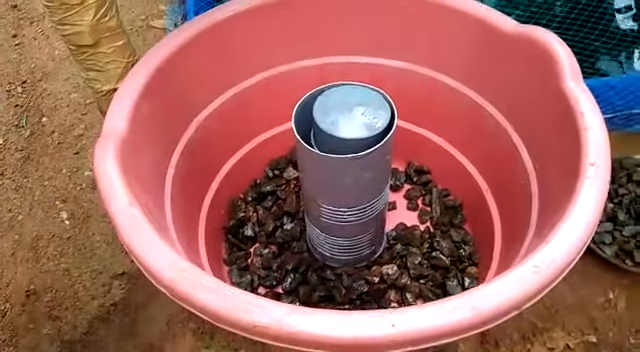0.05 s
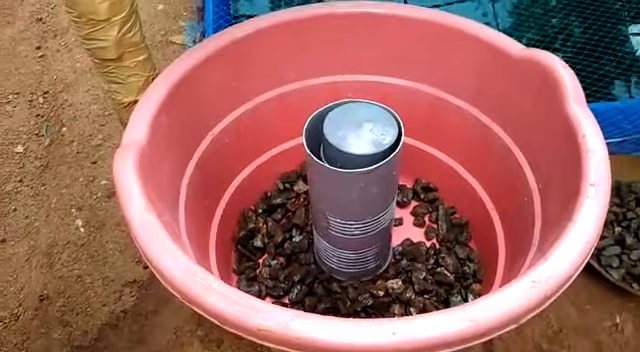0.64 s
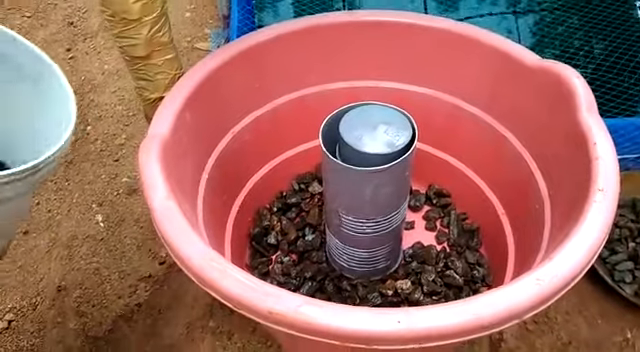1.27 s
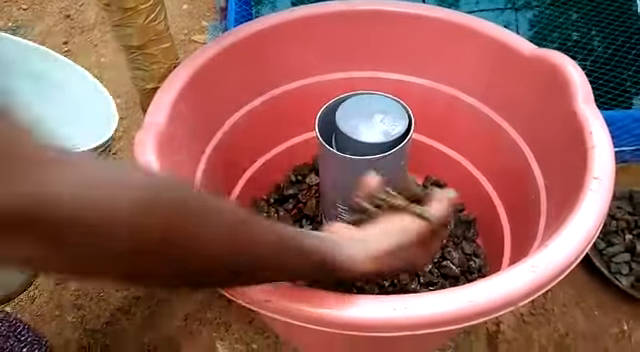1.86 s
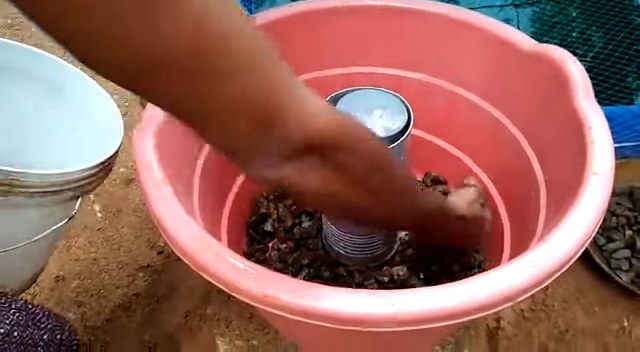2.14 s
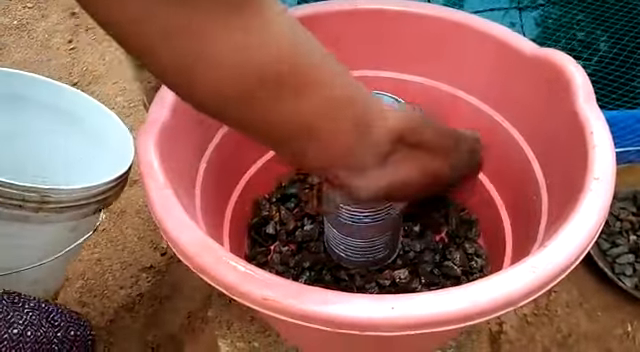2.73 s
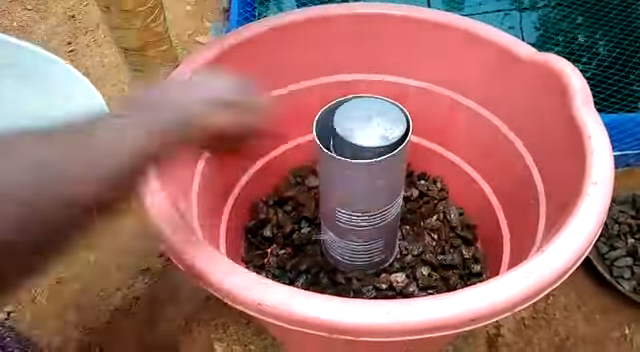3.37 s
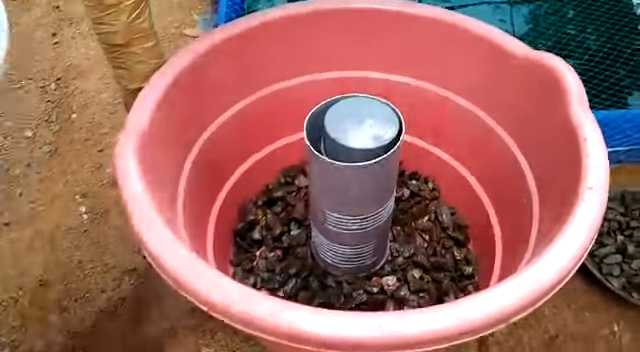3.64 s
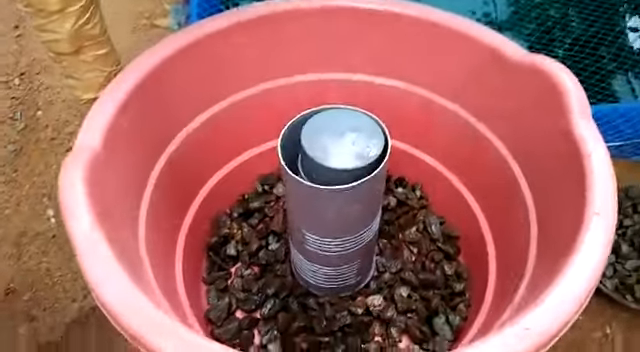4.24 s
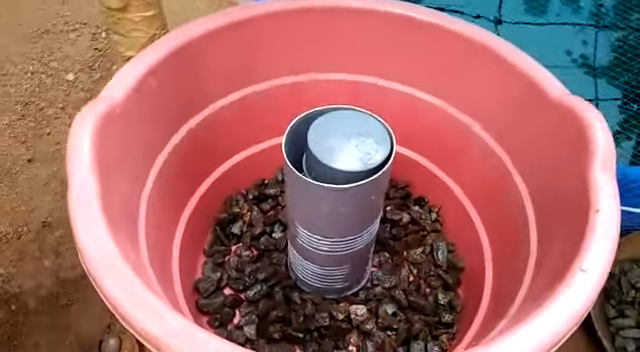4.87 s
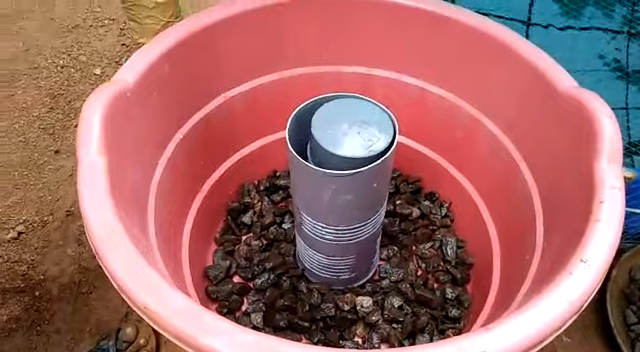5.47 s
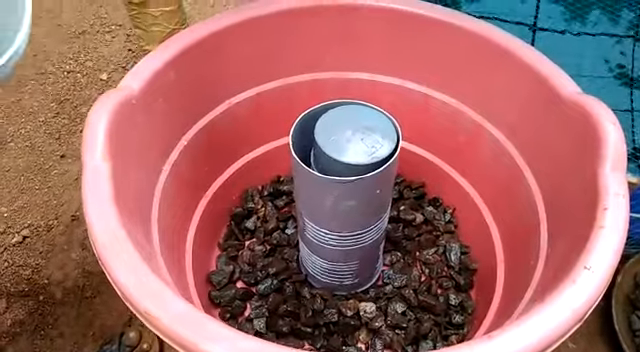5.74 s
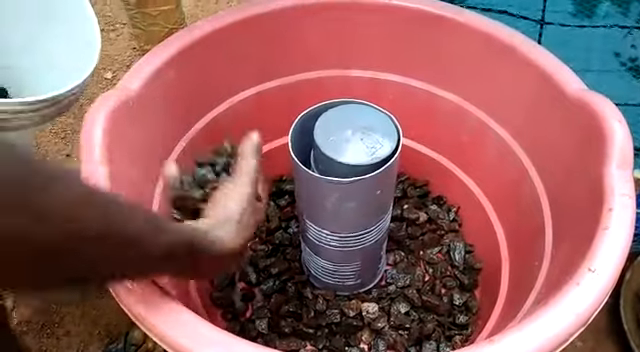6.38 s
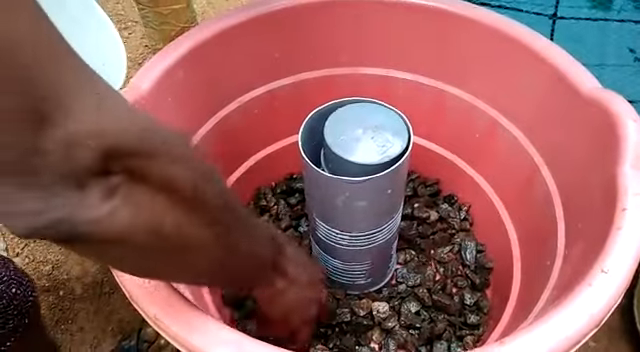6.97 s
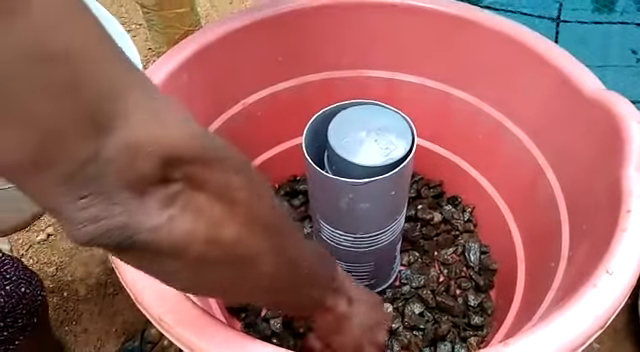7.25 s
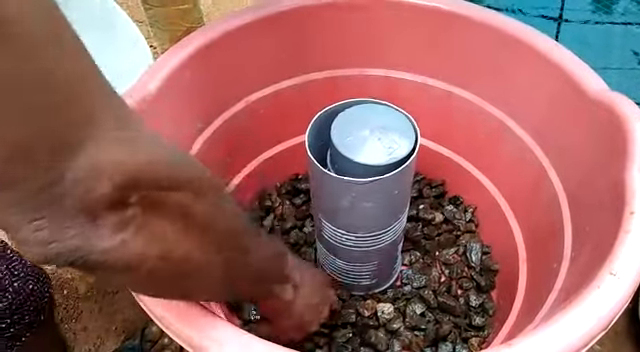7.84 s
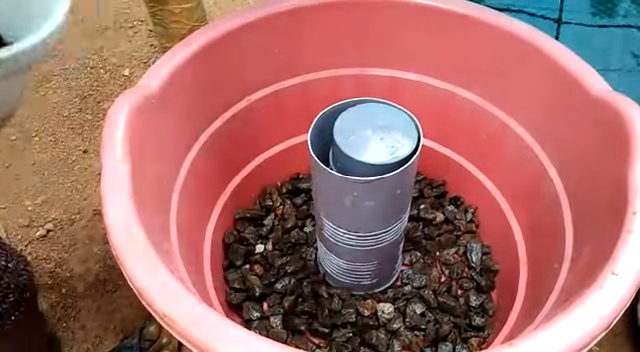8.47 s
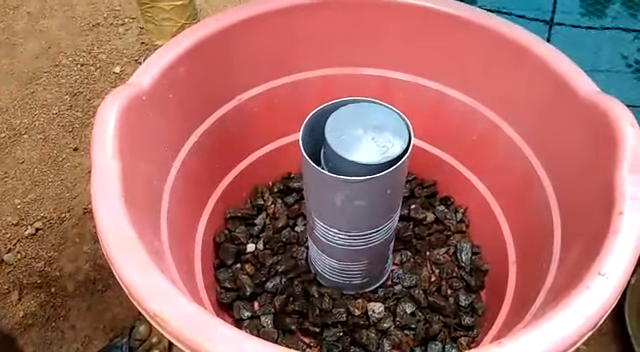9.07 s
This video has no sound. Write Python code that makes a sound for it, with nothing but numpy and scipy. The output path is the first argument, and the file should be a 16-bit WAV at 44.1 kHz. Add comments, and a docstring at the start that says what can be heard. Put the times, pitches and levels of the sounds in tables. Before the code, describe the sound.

Gravel rattles as a hand digs in a bucket, then clatters into a plastic tub and gets pushed around, twice.

```python
"""Crushed stone, scooped by the handful from a bucket, dropped into a plastic tub and spread, outdoors. Each
contact is a short hollow clack on plastic with a bright stone-on-stone tick. Small stones rattle densely
between the single hits. The plastic bottoms drum under heavy falls, the tub's walls ring briefly and the load
shakes the soil. Faint steady air lies underneath; a faint gurgle comes near the end."""
import sys
import numpy as np
from scipy import signal
from scipy.fft import rfft, irfft
from scipy.io import wavfile
from scipy.ndimage import uniform_filter1d

SR = 44100
rng = np.random.default_rng(int(sys.argv[2]) if len(sys.argv) > 2 else 0)


def output_pcm(signal):
    """Save a mono or channel-first signal as 16-bit PCM at the path in sys.argv[1].

    Samples are clipped to [-1, 1] before scaling.
    """
    pcm = np.clip(np.atleast_2d(signal).T, -1, 1) * 32767
    wavfile.write(sys.argv[1], SR, np.round(pcm).astype(np.int16))


N = 406161

# hand digging in the bucket: t/s, length/s, clack/dB, tick/dB re clack, drum/dB re clack, growth/dB
SCOOPS = [(0.0, 0.092, -18.0, -8.5, -13.5, 3), (0.135, 0.208, -20.5, -10.5, -22, -3.5),
          (0.353, 0.22, -30, -9.5, -17.5, 3.0), (0.565, 0.15, -26.5, -8.5, -12.5, 3),
          (0.773, 0.115, -35.5, -7, -12.0, 7.5), (0.947, 0.181, -34.5, -6.0, -16, -3.5),
          (1.231, 0.102, -63.0, -3.5, -5.5, 16.5), (1.414, 0.069, -44, -11, -13, 5.5),
          (3.913, 0.045, -61.5, -27, -7, 7), (3.99, 0.012, -29.0, -10, -7.5, 3),
          (4.072, 0.171, -19.0, -8.5, -11.0, -0.5), (4.266, 0.123, -26, -8, -16.5, -2),
          (4.412, 0.151, -33.5, -10.0, -12.5, 5.5), (4.578, 0.272, -27.0, -9, -13.5, -1.5),
          (4.87, 0.127, -30, -7.5, -9, 3.5), (5.031, 0.196, -31, -8.0, -16.5, -4),
          (5.28, 0.065, -49.5, -6, -7, 1.0), (5.476, 0.023, -37.5, -1.5, -19, -3.5),
          (5.784, 0.061, -50.5, -11.5, -9.5, 4.5), (5.977, 0.16, -61.0, -9, -19.5, -16),
          (8.439, 0.016, -52.0, -8, -10, 3.5), (8.732, 0.065, -41.5, -20, -29.0, 1),
          (8.773, 0.197, -37.0, -8.0, -8.5, -4.0), (9.008, 0.08, -33.5, -6, -12.5, 0),
          (9.169, 0.057, -47, -13.0, -13, 7.0)]
# stones sliding into the tub and pushed about: columns as SCOOPS
SPREADS = [(2.316, 0.082, -74.5, 15, -2.5, 9.5), (2.441, 0.062, -26.5, -7.5, -5, 7.5),
           (2.561, 0.139, -27, -8, -12.5, -0.0), (2.715, 0.065, -25.5, -12, -25, 3),
           (2.801, 0.158, -30, -9.5, -21, -7.0), (3.033, 0.12, -42, -7.5, -12, 0.5),
           (3.179, 0.14, -33.0, -10.0, -20.0, -0.5), (3.367, 0.12, -36.5, -10.5, -15.5, -12),
           (6.648, 0.091, -78, 20.5, -20, 7.5), (6.756, 0.069, -26, -3.0, -20, -6.5),
           (6.879, 0.138, -32, -6, -17, 1), (7.052, 0.033, -30.0, -9.5, -14.5, 4),
           (7.15, 0.118, -37, -8.5, -19.5, 3.5), (7.34, 0.117, -37, -7.0, -17, 3),
           (7.521, 0.054, -32.0, -9.5, -18.5, -5), (7.635, 0.017, -36.5, -8, -22.5, 5.0),
           (7.749, 0.094, -32.5, -10.5, -12.5, 1), (7.929, 0.028, -29, -10.0, -14.5, -0.5),
           (8.015, 0.078, -39, -10.5, -8.5, -7.5), (8.124, 0.055, -39, -10.5, -19.5, -1.5)]
# weights of the stone resonances: f/Hz, level/dB
TICK_SPECTRUM = [(2800, 0.5), (3400, -5), (4000, -0.5), (4900, -4.5), (5800, -1.5), (6800, -1.5),
                 (8200, 8.5), (9200, 7.5), (10500, 1), (12500, -2.5), (14500, -6)]
# plastic wall modes: f/Hz, level/dB, t60/s
WALL_MODES = [(130, -3.5, 0.041), (267, -9.5, 0.066), (451.4, -4, 0.054), (610, -6.5, 0.21),
              (753, -3.5, 0.085), (862, -9, 0.023), (907, -6.5, 0.21), (1157, -5, .07),
              (1361, -16.5, 0.075), (1477, -7, 0.021), (1620, -14, .06), (1900, -5.5, 0.015),
              (2100, -13.5, 0.14)]
# plastic bottom modes: f/Hz, level/dB, t60/s
BOTTOM_MODES = [(160, -25, .05), (191, -10, 0.1), (230, -6, 0.025), (271, 0.5, 0.061), (311.8, -4.5, 0.094),
                (428, -17, .08)]
# heavy falls on the bottom: t/s, level/dB
THUMPS = [(0.018, -18.5), (0.052, -17), (0.135, -24), (0.233, -31), (0.277, -24.5), (0.338, -24),
          (0.598, -27.5), (0.967, -20.5), (2.412, -7.5), (2.485, -16.5), (2.551, -13.5), (2.583, -22),
          (2.622, -24.5), (2.75, -24), (3.995, -23.5), (4.109, -17), (4.173, -20), (4.226, -25.5),
          (4.531, -27), (4.719, -28), (5.155, -23.5), (5.231, -26.5), (6.752, -31), (8.422, -33.5),
          (8.869, -32.5)]
# bands the tub radiates badly: f/Hz, width/Hz
TUB_NULLS = [(385, 39), (520, 29)]
# still outdoor air, relative spectral density: f/Hz, level/dB
AIR_SPECTRUM = [(15, -36), (25, -5), (33, -14), (80, -1.5), (96, -13), (202, -19.5), (392, -20.5),
                (1400, -14), (4850, -27.5), (12600, -29.5), (14000, -34.5)]
# single stones landing: t/s, clack/dB, tick/dB, clack pitch/Hz
HITS = [(0.075, -7, -34, 1800), (0.119, -17.5, -33, 1850), (0.144, -20, -40, 1370),
        (0.162, -16.5, -28, 1290), (0.197, -19.5, -32, 1560), (0.284, -18.5, -42, 1220),
        (0.334, -21, -51, 1720), (0.56, -31, -41, 1670), (0.576, -21, -41, 1620), (0.604, -18.5, -39, 1400),
        (0.778, -24, -49, 1630), (0.813, -21, -37, 1420), (0.874, -16.5, -30.5, 1630),
        (0.887, -27, -39, 1500), (0.915, -23.5, -53, 1490), (0.965, -41, -26, 1330),
        (0.975, -18, -30, 1820), (1.023, -19.5, -45, 1210), (1.042, -20, -37.5, 1380),
        (1.084, -22.5, -28.5, 1480), (1.108, -30, -45, 1560), (1.14, -31.5, -35, 1550),
        (1.187, -57, -43.5, 1670), (1.235, -35.0, -57, 1400), (1.267, -40, -51, 1530),
        (1.306, -45, -38, 1540), (1.318, -47, -36.5, 1500), (1.411, -30.5, -38.5, 1740),
        (1.441, -27.5, -62, 1460), (1.474, -33, -33.5, 1220), (1.484, -28, -45, 1650),
        (1.616, -59.0, -80, 1780), (1.717, -67, -86.0, 1730), (2.318, -66.0, -49.5, 1850),
        (2.42, -12.5, -19, 1480), (2.481, -17, -17.0, 1610), (2.498, -16, -23, 1290),
        (2.562, -20.0, -28.5, 1140), (2.596, -18.5, -27.5, 1090), (2.631, -22.0, -41, 1170),
        (2.708, -21, -30, 1230), (2.741, -17.5, -34, 1180), (2.752, -20.5, -24, 1480),
        (2.821, -23.5, -33, 1370), (2.852, -18, -45, 1340), (2.865, -24, -33, 1450),
        (2.891, -19, -33.0, 1380), (2.912, -24.5, -32.5, 1720), (3.028, -31.5, -36.5, 1050),
        (3.055, -43, -41, 1320), (3.074, -27, -28.5, 1010), (3.27, -25, -35.5, 1460),
        (3.302, -27, -46.5, 1080), (3.346, -29.5, -43.5, 1470), (3.429, -29, -34, 1070),
        (3.454, -32, -43.5, 1430), (3.9, -49, -77, 1610), (3.998, -23, -37, 1450), (4.065, -42, -24, 1510),
        (4.08, -16.5, -23, 1420), (4.128, -20, -36, 1420), (4.18, -14.0, -46, 1400), (4.25, -17, -46, 1840),
        (4.311, -32, -35, 1770), (4.377, -22, -39, 1660), (4.737, -24, -37.5, 1400),
        (4.916, -23, -36.5, 1330), (5.164, -22.5, -36, 1180), (5.194, -27, -37, 1750),
        (5.237, -33, -38, 1810), (5.288, -38.5, -45, 1090), (5.332, -59, -49, 1700),
        (5.417, -55, -48, 1570), (5.448, -67.5, -37.5, 1390), (5.478, -26.5, -36.5, 1600),
        (5.502, -31, -52, 1700), (5.568, -45.5, -48.5, 1720), (5.785, -26.5, -49.5, 1640),
        (5.797, -37.5, -59, 1610), (5.847, -29, -45.5, 1550), (5.953, -55, -65.0, 2280),
        (6.065, -55, -84, 1004), (6.692, -66, -47.5, 2260), (6.731, -21.5, -29.5, 1470),
        (6.743, -18.5, -34, 1380), (6.76, -20.0, -24, 1370), (6.779, -15.5, -25.5, 1440),
        (6.798, -15.5, -27.5, 1480), (6.881, -21.5, -27.5, 1340), (6.913, -23.5, -40, 1400),
        (6.942, -20, -31, 1290), (6.954, -23.5, -30.5, 1280), (6.985, -20.0, -30.5, 1390),
        (7.016, -21, -33.5, 1690), (7.082, -22.5, -35.5, 1400), (7.142, -26.5, -41, 1380),
        (7.185, -25, -39.5, 1340), (7.223, -20, -37, 1230), (7.278, -25.5, -43, 1300),
        (7.34, -23.5, -33.5, 1110), (7.402, -23.5, -29, 1270), (7.457, -22, -48, 1280),
        (7.485, -25.0, -39.5, 1200), (7.562, -22.5, -47, 1330), (7.573, -16.5, -31.5, 1200),
        (7.735, -31.5, -36, 1000), (7.789, -25, -33.5, 1230), (7.809, -19.5, -37.5, 1260),
        (7.836, -22.5, -47, 1320), (7.908, -23, -57, 1020), (7.922, -20, -30.5, 1090),
        (7.945, -16.5, -25.5, 1440), (7.966, -24, -37.5, 1380), (8.02, -21, -36.5, 1400),
        (8.073, -32.5, -42.5, 1230), (8.147, -34.5, -57, 1220), (8.186, -32, -49, 1460),
        (8.292, -74, -54, 1450), (8.429, -36.5, -60, 1380), (8.722, -41, -56.5, 1700),
        (8.778, -31.5, -39, 1600), (9.023, -40, -37.5, 1490)]
# gurgle contour: t/s, f/Hz, level/dB
GURGLE = [(8.53, 1095, -100), (8.545, 1010, -52.5), (8.56, 870, -48), (8.58, 1100, -49.5), (8.59, 335, -79),
          (8.605, 364, -52), (8.635, 445, -54), (8.657, 550, -52), (8.68, 625, -57), (8.72, 640, -100)]

HIT_S = .008  # a hit's level is its energy spread over this time
SWELL_DB_PER_S, STOP_DB_PER_S = 759.5, 240.5
SETTLE_DB, SETTLE_DB_PER_S = -29, 82.5
BUCKET_HZ, TUB_HZ = 1640, 1330
TUB_CONTACT_SHARE = .55  # spread stones touch less often than churned ones
BUCKET_SHAKE_DB = -9  # soil shake, re tub


def from_db(db):
    return 10 ** (np.asarray(db) / 20)


def unit_rms(x):
    return x / np.sqrt(np.mean(x ** 2) + 1e-20)


def per_sample(rows):
    """Columns of (t/s, values...) interpolated to every sample."""
    t_s, *columns = np.transpose(rows)
    return [np.interp(np.arange(N) / SR, t_s, column) for column in columns]


def level_db_at(spectrum, hz):
    """Spectrum interpolated over log frequency."""
    points_hz, level_db = np.transpose(spectrum)
    return np.interp(np.log(hz), np.log(points_hz), level_db)


def cut(x, hz, kind, order=2):
    """Butterworth low- or high-pass."""
    return signal.sosfilt(signal.butter(order, hz, kind, fs=SR, output="sos"), x)


def ring(x, hz, t60_s):
    """Damped resonance; a unit click rings with unit energy."""
    radius = from_db(-60 / (t60_s * SR))
    numerator = np.sqrt((1 - radius ** 2) / 2) * np.array([1, 0, -1])
    denominator = [1, -2 * radius * np.cos(2 * np.pi * hz / SR), radius ** 2]
    return signal.lfilter(numerator, denominator, x + 1e-18)


def strike(onsets, sizes, hz, t60_s, weights, uneven_db, smear_s):
    """Each contact splits its energy unevenly among modes; rough faces excite them slightly apart."""
    shape = (len(onsets), len(hz))
    shares = weights * from_db(uneven_db * rng.standard_normal(shape)) * rng.choice([-1, 1], shape)
    shares *= (sizes / np.linalg.norm(shares, axis=1))[:, None]
    delays = (SR * smear_s * rng.random(shape) ** 2).astype(int)
    starts = np.clip(onsets[:, None] + delays, 0, N - 1)
    return sum(ring(np.bincount(starts[:, k], shares[:, k], N), hz[k], t60_s[k]) for k in range(len(hz)))


def tumble(share, size_db, count):
    """Random contacts, many small, few large; only a share sounds. Returns onset samples, sizes."""
    onsets = rng.integers(0, N, count)
    sizes = from_db(size_db * np.minimum(rng.exponential(1, count), 3))
    sounding = rng.random(count) < np.broadcast_to(share, N)[onsets]
    return onsets, sizes * sounding


def levelled(x, window_s=.088):
    """Running RMS brought to about one."""
    power = uniform_filter1d(uniform_filter1d(x * x, int(window_s * SR)), int(window_s * SR / 2))
    return x / np.sqrt(np.abs(power) + 1e-3 * np.mean(x * x))


def run_powers(runs):
    """Clack, tick and drum power: each run of stones swells, grows or fades, stops and settles."""
    t_s, power = np.arange(0, N, 40) / SR, 1e-12
    for start_s, length_s, clack_db, tick_db, drum_db, growth_db in runs:
        age_s = t_s - start_s
        after_s = np.maximum(age_s - length_s, 0)
        swell_db = SWELL_DB_PER_S * np.minimum(age_s, 0)
        ending_db = np.maximum(-STOP_DB_PER_S * after_s, SETTLE_DB - SETTLE_DB_PER_S * after_s)
        shape_db = swell_db + growth_db * np.clip(age_s / length_s, 0, 1) + ending_db
        levels_db = clack_db + np.array([[0], [tick_db], [drum_db]])
        power = power + from_db(levels_db + shape_db) ** 2
    return np.array(per_sample(np.vstack([t_s, power]).T))


def clacks(onsets, sizes, pitch_hz, t60_s, spread_oct):
    """Stone on plastic: short hollow knocks, pitched by the stone and the spot."""
    hz = np.geomspace(480, 2600, 30)
    weights = np.exp(-.5 * (np.log2(hz / pitch_hz[:, None]) / spread_oct) ** 2)
    return strike(onsets, sizes, hz, t60_s * np.sqrt(hz.mean() / hz), weights, uneven_db=5, smear_s=.0035)


def ticks(onsets, sizes, t60_s, uneven_db, smear_s, tilt_db_per_oct):
    """Stone on stone: high, damped modes radiating differently ahead and sideways. Returns mid, side."""
    hz = np.geomspace(2900, 14200, 44)
    slopes = tilt_db_per_oct + 1.9 * rng.standard_normal(len(onsets))  # corners are brighter than faces
    weights = from_db(level_db_at(TICK_SPECTRUM, hz) + slopes[:, None] * np.log2(hz / hz.mean()))
    mode_t60_s = t60_s * np.sqrt(hz.mean() / hz)
    return np.array([strike(onsets, sizes, hz, mode_t60_s, weights, uneven_db, smear_s) for _ in range(2)])


def rattle(clack_db, tick_db, vessel_hz, contact_share):
    """Small stones and grit tumble: a dense, duller rush when loud, separate clicks when quiet."""
    density = np.clip(contact_share * from_db(.72 * (tick_db + 34.5)), .09, 1)
    onsets, sizes = tumble(density, size_db=2.5, count=16000)
    pitch_hz = vessel_hz[onsets] * 2 ** (.37 * rng.standard_normal(len(onsets)))
    clack = clacks(onsets, sizes, pitch_hz, t60_s=.017, spread_oct=.6)
    grit_onsets, grit_sizes = tumble(density, size_db=2, count=28000)
    tick_onsets = np.r_[onsets, grit_onsets]
    tick_sizes = np.r_[sizes * from_db(2.5 * rng.standard_normal(len(onsets))), grit_sizes * from_db(-5.5)]
    tick = ticks(tick_onsets, tick_sizes, t60_s=.0086, uneven_db=7.5, smear_s=.004,
                 tilt_db_per_oct=-.9 * np.sqrt(density[tick_onsets]))
    return from_db(clack_db + 1) * levelled(clack), from_db(tick_db - .35) * levelled(tick)


def wall(clack):
    """Clacks ring the plastic wall in its own modes."""
    return sum(from_db(level_db) * np.sqrt(np.log(1000) / (t60_s * SR)) * ring(clack, hz, t60_s)
               for hz, level_db, t60_s in WALL_MODES)


def bottom(drum_db):
    """The plastic bottom drums under tumbling stones and booms under heavy falls."""
    hz, mode_db, t60_s = np.transpose(BOTTOM_MODES)
    weights = from_db(mode_db)
    onsets, sizes = tumble(1, size_db=3.5, count=2000)
    drumming = levelled(strike(onsets, sizes, hz, t60_s, weights, uneven_db=.5, smear_s=.0022))
    fall_s, fall_db = np.transpose(THUMPS)
    fall_onsets, fall_sizes = (fall_s * SR).astype(int), np.sqrt(HIT_S * SR) * from_db(fall_db - 3)
    thumps = strike(fall_onsets, fall_sizes, hz, 1.8 * t60_s, weights, uneven_db=5, smear_s=.002)
    boom = from_db(drum_db + .37) * drumming + thumps
    return cut(cut(boom, 740, "low", order=4), 140, "high", order=4)


def reflections(x, t60_s, gap_s=.0016):
    """Dense echoes, decaying exponentially."""
    t_s = np.arange(SR // 2) / SR
    echoes = rng.standard_normal(len(t_s)) * from_db(-60 * t_s / t60_s) * (t_s > gap_s)
    return signal.fftconvolve(x, echoes / np.linalg.norm(echoes))[:N]


def soil_rumble(bucket_power, tub_power):
    """The weight of moving stones shakes tub and bucket on the soil."""
    load_db = 10 * np.log10(tub_power + from_db(BUCKET_SHAKE_DB) ** 2 * bucket_power)
    level_db = -68.5 + .3 * (np.maximum(load_db, -110) + 33)
    rumble = cut(cut(rng.standard_normal(N), 38, "high", order=3), 64, "low", order=4)
    return from_db(level_db) * unit_rms(rumble)


def air(level_db=-78):
    """Still outdoor air: steady shaped noise."""
    hz = np.maximum(np.arange(N // 2 + 1) * SR / N, 1)
    spectrum = rfft(rng.standard_normal(N)) * from_db(level_db_at(AIR_SPECTRUM, hz))
    return from_db(level_db) * unit_rms(irfft(spectrum, N))


def single_stones():
    """Larger stones graze, land with a clack and a tick, then touch again as they tip over."""
    land_s, clack_db, tick_db, pitch_hz = np.transpose(HITS)
    graze_s = land_s - rng.uniform(.00057, .0029, len(land_s))
    tip_s = land_s + rng.uniform(.003, .0098, len(land_s))
    onsets = (np.r_[graze_s, land_s, tip_s] * SR).astype(int)
    clack_sizes = np.sqrt(HIT_S * SR) * from_db(np.r_[clack_db - 16, clack_db + 1.3, clack_db - 6])
    tick_sizes = np.sqrt(HIT_S * SR) * from_db(np.r_[tick_db - 13, tick_db + 1.3, tick_db - 6.5])
    clack = clacks(onsets, clack_sizes, np.tile(pitch_hz, 3), t60_s=.018, spread_oct=.55)
    tick = ticks(onsets, tick_sizes, t60_s=.018, uneven_db=6.5, smear_s=.0025, tilt_db_per_oct=2)
    return clack, tick


def gurgle():
    """A faint, rough tone that dips, then rises from below."""
    hz, level_db = per_sample(GURGLE)
    throb = unit_rms(1 + 1.2 * unit_rms(cut(rng.standard_normal(N), 60, "low")))
    return from_db(level_db - .5) * throb * np.sin(2 * np.pi * np.cumsum(hz) / SR)


def scene():
    """All sources centred; only the ticks' treble has width."""
    bucket, tub = run_powers(SCOOPS), run_powers(SPREADS)
    clack_db, tick_db, drum_db = 10 * np.log10(bucket + tub)
    in_bucket = bucket[0] > tub[0]
    vessel_hz = np.where(in_bucket, BUCKET_HZ, TUB_HZ)
    contact_share = np.where(in_bucket, 1, TUB_CONTACT_SHARE)
    hit_clack, hit_tick = single_stones()
    run_clack, run_tick = rattle(clack_db, tick_db, vessel_hz, contact_share)
    clack = hit_clack + run_clack
    plastic = cut(from_db(-3) * (clack + wall(clack)), 2735, "low", order=8)
    mid_tick, side_tick = cut(hit_tick + run_tick, 1600, "high")
    direct = cut(plastic, 78, "high", order=4) + mid_tick + bottom(drum_db)
    for hz, width_hz in TUB_NULLS:
        direct = signal.lfilter(*signal.iirnotch(hz, hz / width_hz, fs=SR), direct)
    mid = direct + from_db(-11.5) * reflections(direct, t60_s=.066)
    mid += from_db(-27.5) * reflections(direct, t60_s=.2)
    side = side_tick + from_db(-11) * reflections(side_tick, t60_s=.07)
    side = from_db(-6.8) * cut(side, 6700, "high", order=6)
    stones = np.array([mid + side, mid - side])
    return stones + soil_rumble(bucket[0], tub[0]) + gurgle() + air()


def record(dry):
    """Soft clip, then a steep low-pass."""
    ceiling, cutoff_hz = .9, 14250
    rounded = ceiling * np.tanh(dry / ceiling)
    return signal.sosfilt(signal.ellip(12, .2, 70, cutoff_hz, fs=SR, output="sos"), rounded)


dry = scene()
out = record(dry)
output_pcm(out)
```